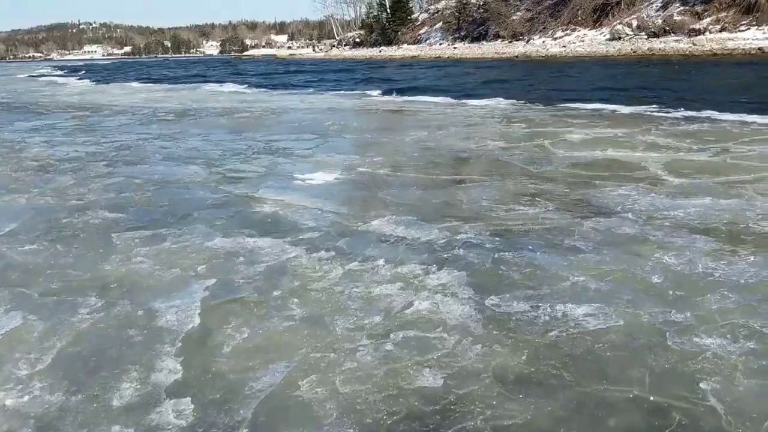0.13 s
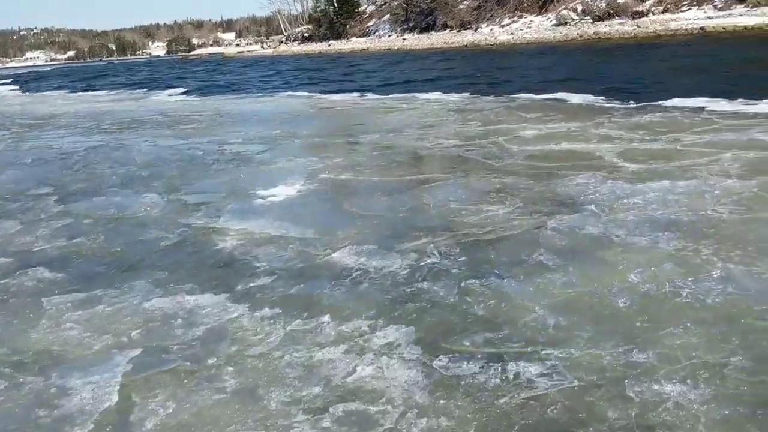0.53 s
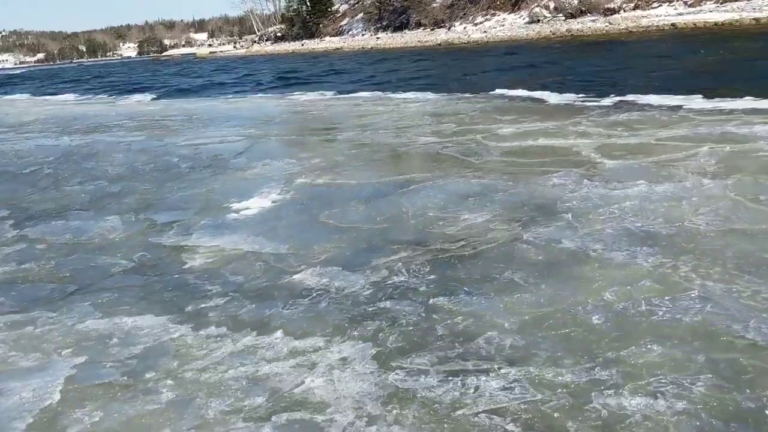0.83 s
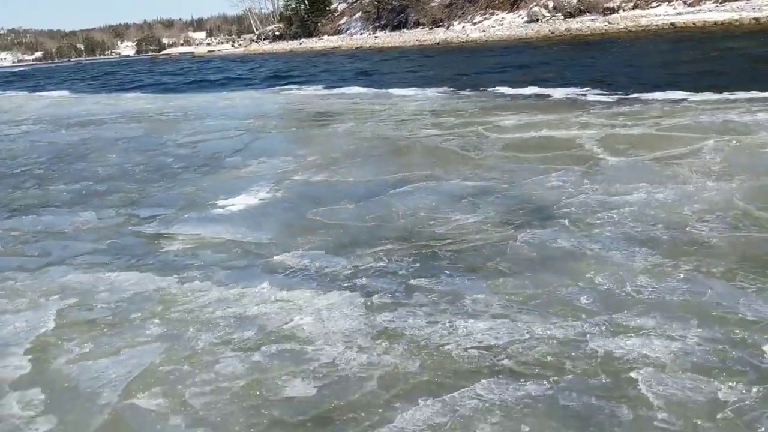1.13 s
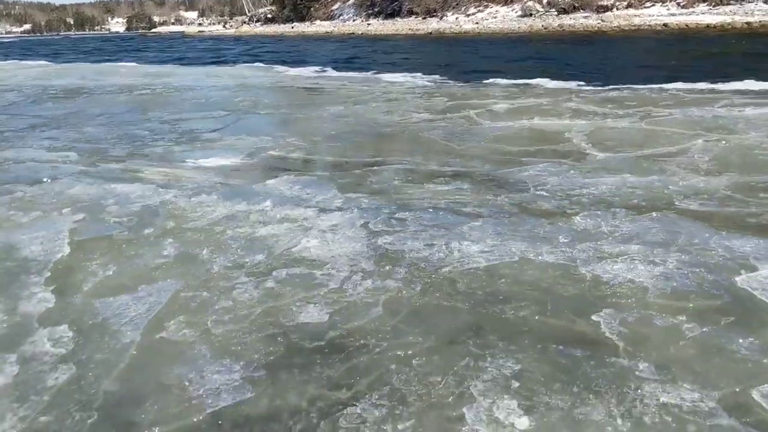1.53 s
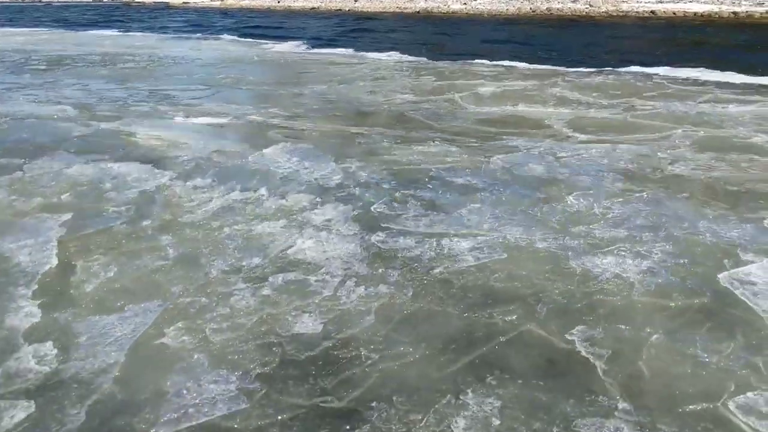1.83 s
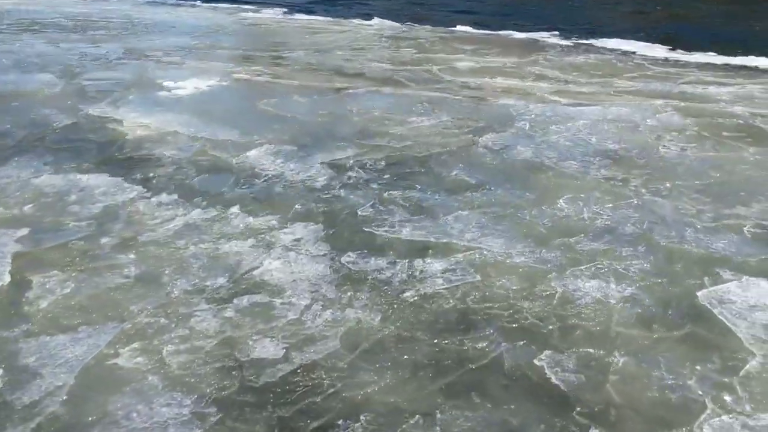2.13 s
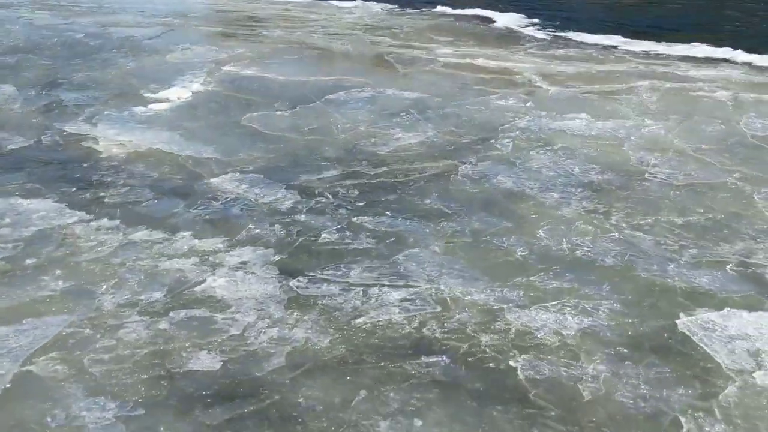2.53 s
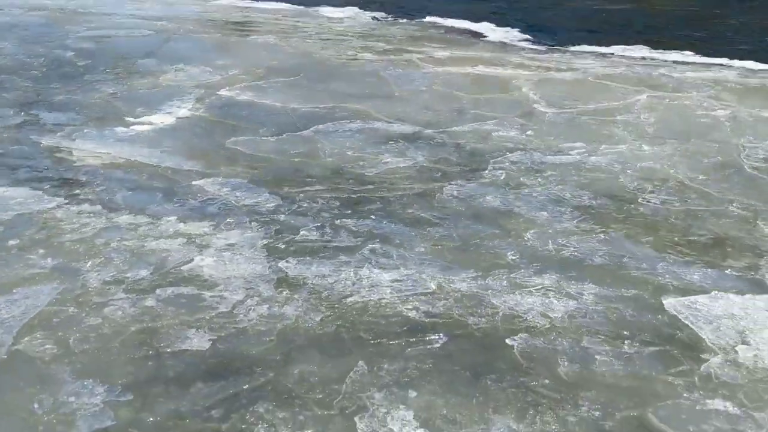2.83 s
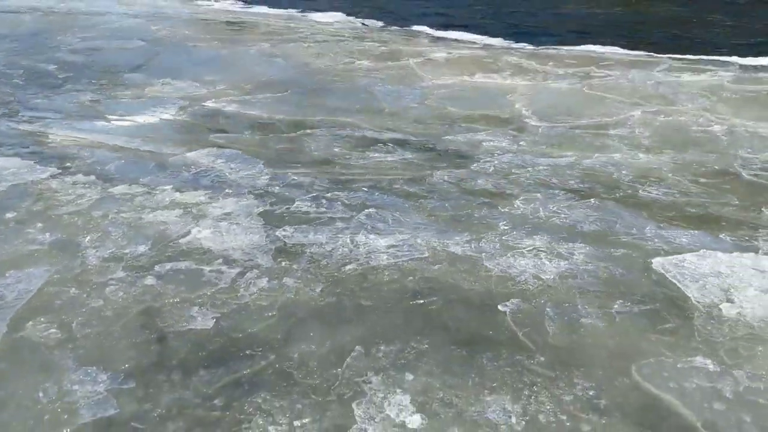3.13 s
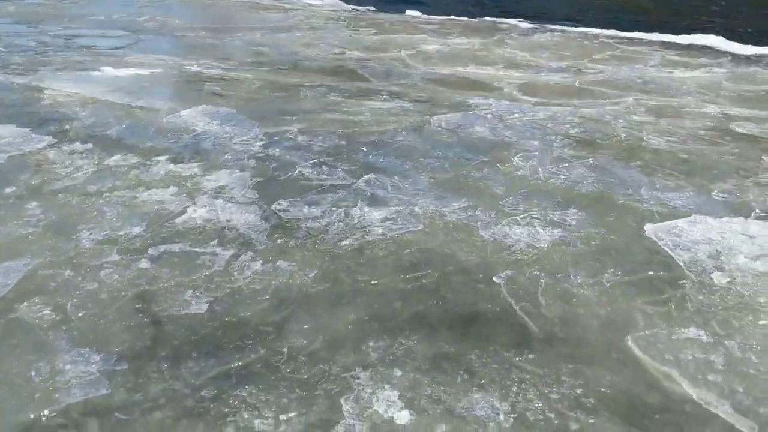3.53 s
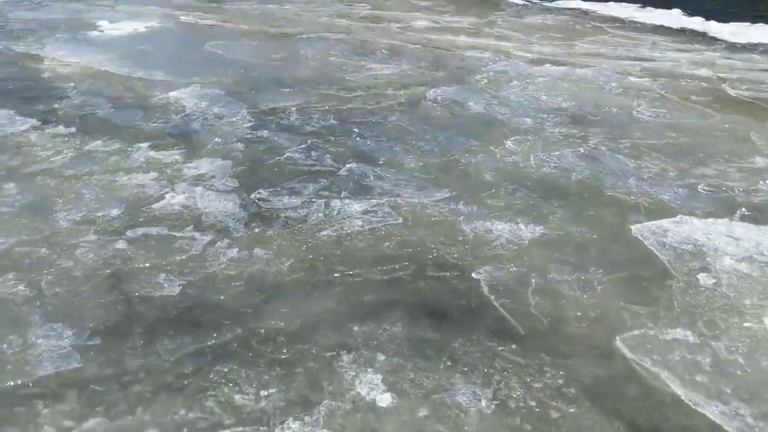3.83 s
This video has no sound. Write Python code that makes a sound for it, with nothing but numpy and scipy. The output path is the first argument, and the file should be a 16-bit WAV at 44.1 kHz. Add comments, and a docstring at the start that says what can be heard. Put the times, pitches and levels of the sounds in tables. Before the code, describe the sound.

Wind buffets an outdoor microphone at an icy shore: a quiet slush hiss and low water wash first, then rumble rises and becomes irregular heavy thumps, with faint ice ticks.

```python
"""From the start slushy sea ice hisses: crystals rub as filtered noise, above a low wash of coloured-noise water.
After half a second a breeze rises over a faint stir of air, its rumble a dense train of skewed eddy pulses.
Now and then a piece of ice ticks: a noise crack and a damped ring. From about one second on, strong single
eddies buffet the microphone as thumps, sharpened by small quick swirls."""
import sys
import numpy as np
from scipy import signal
from scipy.fft import rfft, irfft, next_fast_len
from scipy.io import wavfile
from scipy.ndimage import uniform_filter1d

SR = 44100
rng = np.random.default_rng(int(sys.argv[2]) if len(sys.argv) > 2 else 0)


def persist_wave(psi):
    """Save psi, clipped to +-1, as 16-bit WAV."""
    counts = np.round(np.clip(psi, -1, 1) * 32767).astype(np.int16)
    wavfile.write(sys.argv[1], SR, np.atleast_2d(counts).T)


N = 176400

# Table levels marked "untrimmed" are shifted by the source's own trim below.
# Rubbing of the slush: t/s, untrimmed body level/dB, level of the fine fizz/dB (trim on the steady fizz only)
SLUSH_LEVELS = [(0, -41, -43.5), (0.3, -43, -42.5), (0.55, -40.5, -40.2), (0.8, -39, -37.5),
                (0.97, -37, -36.5), (1.07, -40.5, -43.5), (1.18, -43.5, -46.5), (1.45, -44.5, -47),
                (1.7, -41, -46), (1.9, -43.5, -44), (2.3, -43, -44.5), (2.5, -44, -43.5),
                (2.66, -40, -41.0), (2.78, -40.5, -44), (2.88, -46.5, -48.5), (3.1, -45.5, -49),
                (3.33, -47.9, -48.5), (3.45, -43.5, -45), (3.62, -43.5, -45.5), (3.8, -47, -48.5),
                (4, -46.5, -48.5)]
# Water washing under the ice: t/s, level/dB
WATER_LEVEL = [(0, -38), (.08, -32.5), (.17, -35), (.19, -28.5), (.21, -35.5), (.3, -39), (1, -39.5),
               (4, -43)]
# Strength of the wind at the microphone: t/s, untrimmed level/dB
WIND_LEVEL = [(0.0, -30.5), (0.11, -42), (0.79, -19.5), (0.8, -25.5), (0.98, -19), (1.06, -19.5),
              (1.16, -16), (1.19, -25), (1.27, -18), (1.56, -21.5), (1.59, -13.5), (1.63, -27.5),
              (1.66, -20), (1.75, -28), (1.8, -19), (1.87, -25.5), (1.92, -21), (2.02, -25.5), (2.1, -19),
              (2.17, -21), (2.23, -30), (2.25, -19), (2.43, -18.5), (2.47, -28), (2.52, -20.5),
              (2.62, -29.5), (2.63, -21.5), (2.85, -19), (2.91, -26.5), (3.03, -17.5), (3.14, -26),
              (3.21, -17), (3.25, -36), (3.29, -15.5), (3.36, -35.5), (3.45, -24.5), (3.5, -30.5),
              (3.55, -17.5), (3.59, -25), (3.61, -22), (3.69, -22.5), (3.78, -18), (3.81, -29), (4.0, -15)]
# Typical turning rate of the eddies, which rises with the speed of the air: t/s, f/Hz
EDDY_RATE = [(0, 73.6), (.7, 97), (1.05, 121), (1.4, 153), (1.8, 131), (2.3, 148), (2.65, 112), (2.95, 145),
             (3.5, 112.6), (4, 141)]
# Ice ticks: t/s, untrimmed level/dB, ring f/Hz, share of broadband crack (clipped to 0-1), decay to 1/e /s
ICE_TICKS = [(.312, -29, 7550, 5, .002), (.93, -23, 5200, 4, 0.0033), (1.2, -33, 12000, .5, .001),
             (1.257, -31, 7000, .9, .002), (1.338, -29, 6300, 5, .0015), (1.354, -25.5, 6200, .8, 0.0023),
             (1.529, -29.5, 6500, .3, .002), (1.907, -22.5, 6700, 3, .002), (1.926, -26, 5400, .4, 0.0024),
             (2.046, -29, 5900, 1, .002), (2.063, -29.5, 5500, .3, .003), (2.106, -29, 6800, 3, .002),
             (2.171, -30, 5400, -0.5, .002), (2.438, -24.5, 7230, -2.2, 0.0017),
             (2.680, -18.5, 5280, 1.8, 0.0046), (2.788, -31, 2200, 0, 0.0046),
             (2.960, -28.5, 7160, 0.2, 0.0016), (3.165, -34, 6110, .7, .003), (3.594, -32, 5010, .3, .002),
             (3.832, -35, 3650, -1.5, 0.0027), (3.869, -32, 6900, .2, 0.0028),
             (3.958, -27, 7400, 0, 0.0021)]
# Strongest eddies: t/s, untrimmed peak level/dB, heard pitch f/Hz
STRONG_EDDIES = [(0.9608, -4, 149), (1.1396, -10.5, 303), (1.1564, 0.5, 209), (1.3018, -3, 248),
                 (1.355, -1.5, 242), (1.3987, -2, 213), (1.4129, -5.5, 284), (1.4286, -6, 223),
                 (1.4386, -10, 286), (1.479, -4.5, 246), (1.5844, -4, 228), (1.645, -5, 238),
                 (1.659, -1.5, 225), (1.808, -5.5, 220), (1.9156, -1.5, 201), (1.9744, -5.5, 194),
                 (2.0967, -4.5, 210), (2.2499, -5, 172), (2.3196, -19, 270), (2.41, -8, 248),
                 (2.51, -6, 202), (2.6961, -5.5, 240), (2.799, -1, 198), (2.8518, 0.5, 263),
                 (2.8571, -1, 250), (2.884, -7, 260), (2.917, -2.5, 324), (3.0252, -5.5, 204),
                 (3.0571, -6, 258), (3.0656, -7.5, 360), (3.0822, -11.5, 400), (3.1204, -8, 305),
                 (3.1716, -9, 380), (3.2026, -2, 256), (3.2888, -2, 490), (3.3208, -11, 305),
                 (3.5479, -9, 305), (3.767, -6, 400), (3.7769, -9.5, 220), (3.8696, -5, 400),
                 (3.9075, -16, 380), (3.9665, -5, 267), (3.989, -9, 250)]
# Relative spectra of the slush body, slush fizz, water and ice crack: f/Hz, level/dB
BODY_SPECTRUM = [(300, -18.5), (700, -2.5), (1150, 0.5), (1600, -2), (2300, -3.5), (3200, -8), (4500, -30),
                 (8000, -38)]
FIZZ_SPECTRUM = [(1500, -23), (3000, -2), (4300, 1), (5500, 1), (7200, 2.5), (10000, -3), (12500, -9.5),
                 (15500, -16)]
WATER_SPECTRUM = [(25, -17), (60, -6.5), (150, -2), (330, 2.5), (500, 0.5), (700, -6), (1050, -15.5),
                  (1500, -27), (2500, -31)]
CRACK_SPECTRUM = [(800, -15), (2500, -3), (6000, 0), (10000, 2), (15500, -5)]
# Frequency response of the microphone: f/Hz, level/dB
MICROPHONE_RESPONSE = [(20, -32), (31, -25), (50, -6), (80, 0), (160, 1.5), (7400, 0.5), (7900, -2.5),
                       (8600, -11.5), (9800, -7), (16000, -6)]

BODY_TRIM_DB, FIZZ_TRIM_DB, SNAP_DB = 1, 2, -10.5
WIND_TRIM_DB, TICK_TRIM_DB, BUFFET_TRIM_DB = 1, -2.5, -3.5
SNAP_SCATTER_DB = 8  # mean of the exponential scatter, before its tail is cut
PATCH_DB, PATCH_RATE = 0.74, 12  # spread of each narrow band's wandering, and its new values per second
EDDY_SPREAD_OCT, EDDY_SCATTER_DB = 0.51, 3  # standard deviations of turning rate and strength
EDDY_TOP_HZ = 260  # quickest turning rate in the rumble
EDDY_FRONT_RAD, EDDY_SKEW = 0.88, 0.16  # balance of push and pull; how much slower recovery is than front
TICK_PHASE_HZ = 950  # variance of the ring's phase grows by pi times this per second
BUFFET_SLOWING = 0.73  # turning rate as a share of the heard pitch
SWIRL_HZ = 744  # turning rate of the small quick swirl
SWIRL_DB, SWIRL_DB_PER_OCT = -20.5, 11  # relative to the untrimmed eddy level, for a 400 Hz pitch; its slope
TOP_HZ = 15750  # upper edge of the passband


def undb(db):
    """Logarithmic scale: convert decibels to an amplitude ratio."""
    return 10 ** (np.asarray(db) / 20)


def unit(x):
    """Power normalisation: scale to rms 1."""
    return x / np.sqrt(np.mean(x ** 2))


def curve(rows, at, column=1):
    """Linear interpolation: read one table column at the given times."""
    rows = np.array(rows, float)
    return np.interp(at, rows[:, 0], rows[:, column])


def colour(x, points):
    """Linear filtering: weight the spectrum by (f/Hz, level/dB) points on a logarithmic frequency axis."""
    hz, db = np.array(points, float).T
    size = next_fast_len(len(x) + 8192)
    f = np.maximum(np.fft.rfftfreq(size, 1 / SR), 1)
    gain = undb(np.interp(np.log(f), np.log(hz), db))
    return irfft(rfft(x, size) * gain, size)[:len(x)]


def noise(points):
    """Spectral shaping: coloured Gaussian noise of rms 1."""
    return unit(colour(rng.standard_normal(N), points))


def walk(rate):
    """Smoothed random modulation: piecewise-linear wandering of rms 1, with `rate` new values per second."""
    hold = max(int(SR / rate), 2)
    steps = np.repeat(rng.standard_normal(1024), hold)[:N + hold]
    return unit(uniform_filter1d(steps, hold)[:N])


def add(out, start, sound):
    """Superposition: mix in a sound at a time in seconds."""
    i = int(start * SR)
    a, b = max(i, 0), min(i + len(sound), N)
    if b > a:
        out[a:b] += sound[a - i:b - i]


def patchy(x, count=36):
    """Independent band modulation: patches of slush take turns as narrow bands swell and fade."""
    spectrum = rfft(x)
    f = np.maximum(np.fft.rfftfreq(N, 1 / SR), 1)
    place = np.interp(np.log(f), np.log([600, 16000]), [0, count - 1])
    out = np.zeros(N)
    for k in range(count):
        overlap = np.maximum(1 - np.abs(place - k), 0)  # triangular band
        out += irfft(spectrum * overlap, N) * undb(PATCH_DB * walk(PATCH_RATE))
    return unit(out)


def slush(t, flicker_db=0.81, count=5000):
    """Friction as a sum of many contacts: broad hiss, finer fizz and tiny impulsive snaps."""
    body_level = curve(SLUSH_LEVELS, t) + BODY_TRIM_DB + flicker_db * walk(22.43)
    body = patchy(noise(BODY_SPECTRUM)) * undb(body_level)
    fizz = patchy(noise(FIZZ_SPECTRUM)) * undb(FIZZ_TRIM_DB + flicker_db * walk(24.23))
    scatter = np.minimum(rng.exponential(size=count), 6)
    sizes = rng.choice([-1, 1], count) * undb(SNAP_SCATTER_DB * scatter)
    impulses = np.bincount(rng.integers(0, N, count), sizes, N)
    snaps = unit(colour(impulses, FIZZ_SPECTRUM)) * undb(SNAP_DB)
    return body + (fizz + snaps) * undb(curve(SLUSH_LEVELS, t, column=2))


def water(t, lap_db=-2.0):
    """Amplitude-modulated noise: a low wash of water moving under the ice."""
    return noise(WATER_SPECTRUM) * undb(curve(WATER_LEVEL, t) + lap_db * walk(18))


def eddy(hz):
    """Advected vortex pressure: steep push, slower pull; returns the pulse and its lead time in seconds."""
    phase = np.arange(-4, 7, 2 * np.pi * hz / SR)
    # Warped phase runs ever more slowly, stretching the recovery.
    u = (1 - np.exp(-EDDY_SKEW * phase)) / EDDY_SKEW - np.cos(EDDY_FRONT_RAD) / 2
    shape = np.sin(EDDY_FRONT_RAD) * (1 - u ** 2) - np.cos(EDDY_FRONT_RAD) * u
    pulse = shape * np.exp(-u ** 2 / 2) * signal.windows.tukey(len(u), .3)
    return pulse / pulse.max(), -phase[0] / (2 * np.pi * hz)


def wind(t, count=900):
    """Turbulent pressure: eddies of many sizes cross the microphone, quicker and stronger in gusts."""
    out = np.zeros(N)
    times = (np.arange(count) + rng.uniform(-1.02, 1, count)) / count * N / SR
    for at, (size, strength, side) in zip(times, rng.standard_normal((count, 3))):
        hz = curve(EDDY_RATE, at) * 2 ** (EDDY_SPREAD_OCT * size)
        pulse, lead = eddy(np.clip(hz, 20, EDDY_TOP_HZ))
        add(out, at - lead, pulse * np.sign(side) * undb(EDDY_SCATTER_DB * strength))
    # Even out the running rms over 50 ms so that the level table sets the gusts.
    out /= np.sqrt(uniform_filter1d(out ** 2, size=2200) + 1e-9)
    return out * undb(curve(WIND_LEVEL, t) + WIND_TRIM_DB)


def ticks(t, attack_s=0.000067, size=2048):
    """Damped resonance under impulsive excitation: snapping ice gives a short crack and a narrow-band ring."""
    out, cracks, age = np.zeros(N), noise(CRACK_SPECTRUM), t[:size]
    for k, (at, db, hz, share, decay) in enumerate(ICE_TICKS):
        share = np.clip(share, 0, 1)
        # A random walk of phase broadens the ring's spectral line.
        wobble = np.cumsum(rng.standard_normal(size)) * np.sqrt(np.pi * TICK_PHASE_HZ / SR)
        ring = np.sqrt(2) * np.sin(2 * np.pi * hz * age + wobble)
        crack = cracks[k * size:(k + 1) * size]
        burst = np.sqrt(share) * crack + np.sqrt(1 - share) * ring
        envelope = (1 - np.exp(-age / attack_s)) * np.exp(-age / decay)
        add(out, at, burst * envelope * undb(db + TICK_TRIM_DB))
    return out


def buffets():
    """Isolated vortex passage: strong eddies thump, with a swirl relatively stronger on quicker ones."""
    out = np.zeros(N)
    swirl, swirl_lead = eddy(SWIRL_HZ)
    for at, db, hz in STRONG_EDDIES:
        pulse, lead = eddy(hz * BUFFET_SLOWING)
        add(out, at - lead, pulse * undb(db + BUFFET_TRIM_DB))
        swirl_db = db + SWIRL_DB + SWIRL_DB_PER_OCT * np.log2(hz / 400)
        add(out, at - swirl_lead, swirl * undb(swirl_db))
    return out


def scene():
    """Superposition of pressures: ice, water and wind at one microphone."""
    t = np.arange(N) / SR
    return (slush(t) + water(t) + wind(t) + ticks(t) + buffets())[None]


def record(dry):
    """Transducer response: thin deep bass, lowered top, soft saturation of hard thumps, then a band limit."""
    heard = colour(dry[0], MICROPHONE_RESPONSE)
    heard = heard / (1 + (heard / .8) ** 6) ** (1 / 6)  # approaches an amplitude of 0.8
    low_pass = signal.ellip(10, .2, 80, TOP_HZ, fs=SR, output="sos")
    return signal.sosfilt(low_pass, heard)[None]


dry = scene()
out = record(dry)
persist_wave(out)
```